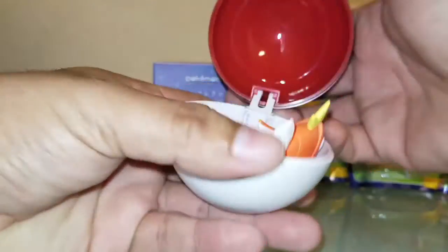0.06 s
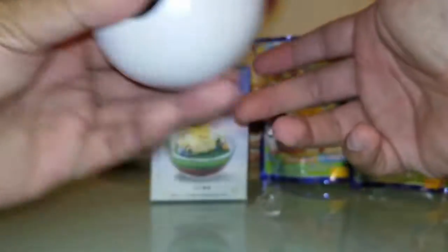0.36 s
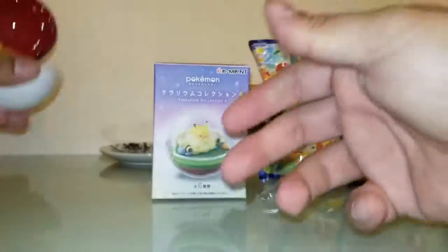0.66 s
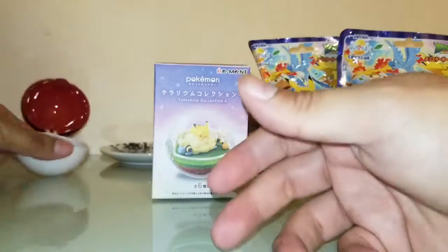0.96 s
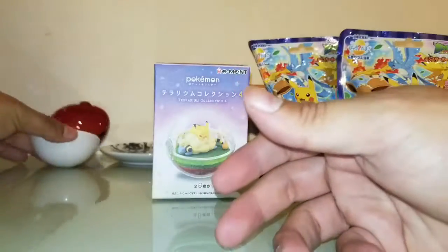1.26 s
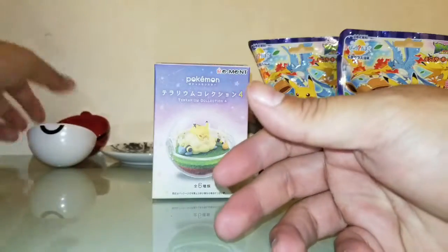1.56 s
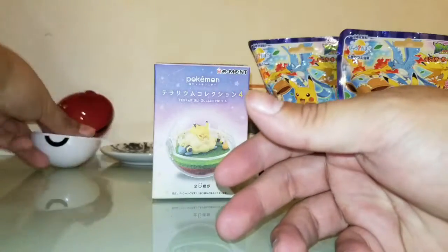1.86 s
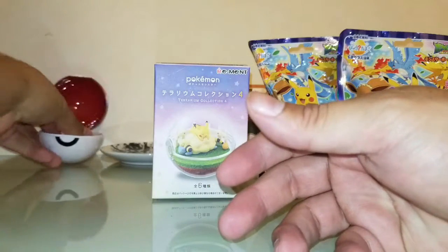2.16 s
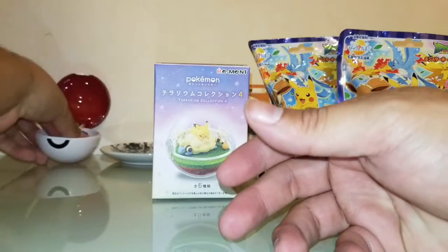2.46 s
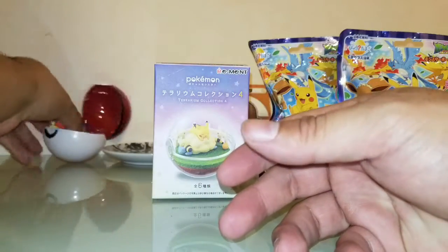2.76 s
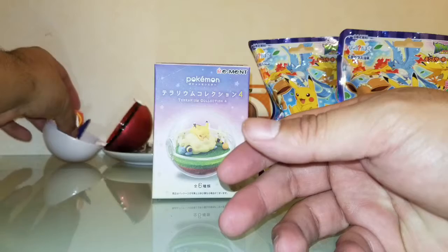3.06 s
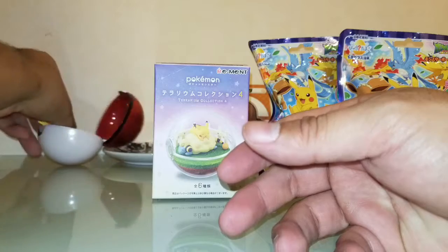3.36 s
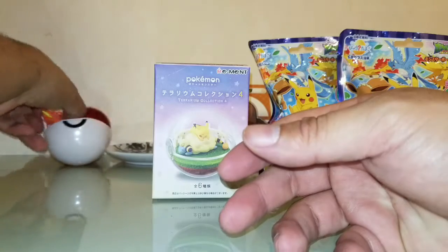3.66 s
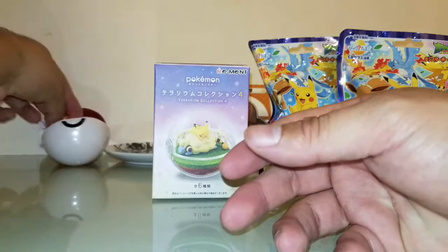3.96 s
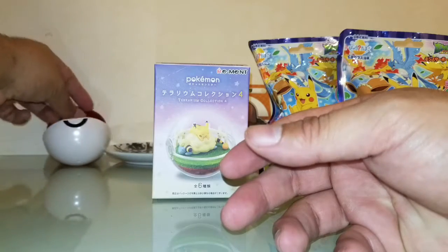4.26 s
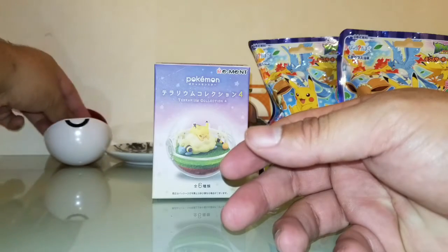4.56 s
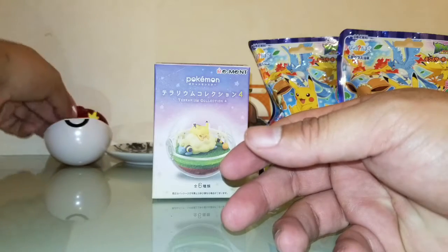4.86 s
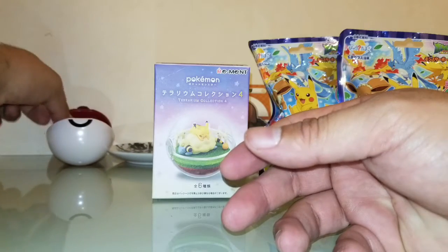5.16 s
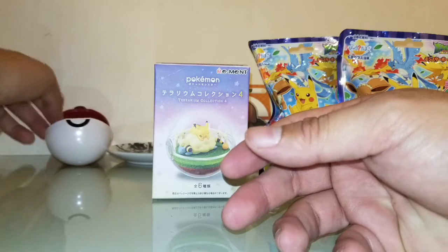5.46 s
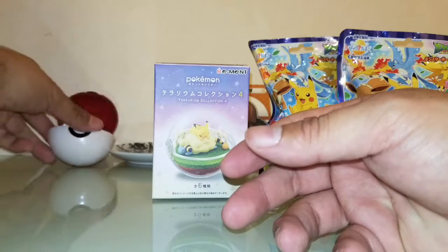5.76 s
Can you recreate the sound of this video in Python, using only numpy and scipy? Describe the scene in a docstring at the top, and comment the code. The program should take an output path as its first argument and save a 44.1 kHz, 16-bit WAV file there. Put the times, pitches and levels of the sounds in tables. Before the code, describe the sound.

A hollow plastic toy ball is handled slightly left of the microphone in a small, lightly echoing room. A faint rumble and motor hum continue throughout, and fingers hiss softly on the plastic now and then. At about 0.6 seconds a catch clicks sharply and the hinge scrapes. The ball knocks on a glass table at 0.85 seconds, clacks again at 1.2 and gives a soft, hollow bump at 1.8. From 2.5 to 2.9 seconds comes a cluster of clacks, the sharpest near 2.75, which sets a china saucer ringing briefly. A hollow bump at 3.5 seconds is followed at once by a bright snap of the catch. Lighter, uneven clicks and small scrapes continue as the halves are fitted together, with a firmer clack and faint china ring at 4.9 seconds and a smaller clack at 5.4.

```python
"""A small room, a glass table: a hollow two-part plastic toy ball is handled left of the microphone.
Over a faint rumble and motor hum, fingers hiss on the plastic and the lid scrapes at its hinge.
The halves, a domed lid and a bowl, clack against each other and the table, ringing their modes.
Now and then the springy catch slips, the bowl bumps the table or a knock rings a china saucer."""
import sys
import numpy as np
from scipy import signal
from scipy.fft import rfft, irfft, next_fast_len
from scipy.io import wavfile
from scipy.ndimage import uniform_filter1d, map_coordinates

SR = 44100
rng = np.random.default_rng(int(sys.argv[2]) if len(sys.argv) > 2 else 0)


def file_out(sig):
    """Save sig as 16-bit WAV at sys.argv[1]."""
    # one column per channel
    cols = np.atleast_2d(sig).T
    # limit, then scale
    lim = np.clip(cols, -1, 1)
    pcm = np.round(lim * 32767).astype(np.int16)
    wavfile.write(sys.argv[1], SR, pcm)


N = 255768
TIME_S = np.arange(N) / SR
RING_SIZE = 24576   # samples per blow
RING_S, RING_HZ = np.arange(RING_SIZE) / SR, np.fft.rfftfreq(RING_SIZE, 1 / SR)
RIGHT_LAG_S = 0.00015   # ball lies to the left


def from_db(db):
    """Decibels to gain."""
    return 10 ** (np.asarray(db) / 20)


def rms_one(x):
    """Scale to unit power."""
    return x / np.sqrt(np.mean(x ** 2) + 1e-20)


def at_hz(points, hz):
    """Read (f/Hz, value) rows on a log-frequency axis."""
    f, value = np.transpose(points)
    return np.interp(np.log(np.maximum(hz, 1)), np.log(f), value)


def add(out, start_s, sound):
    """Mix in a stereo sound, last tenth faded."""
    at = int(round(start_s * SR))
    fade = np.minimum(1, 10 * np.linspace(1, 0, sound.shape[1])) ** 2
    out[:, at:at + sound.shape[1]] += (sound * fade)[:, :N - at]


def drift(rate_hz):
    """Slow random wander, spread 1."""
    hz = np.fft.rfftfreq(RING_SIZE, 1 / 1000)   # 1 ms steps
    slow = irfft(rfft(rng.standard_normal(RING_SIZE)) / (1 + (hz / rate_hz) ** 2))
    return np.interp(TIME_S * 1000, np.arange(RING_SIZE), rms_one(slow))


def coloured(x, spectrum):
    """Give a steady sound a spectrum; rms 1."""
    size = next_fast_len(N)
    gain = from_db(at_hz(spectrum, np.fft.rfftfreq(size, 1 / SR)))
    return rms_one(irfft(rfft(x, size) * gain, size)[:, :N])


def causal(level_db):
    """Minimum-phase response: peaks ring after the blow, never before."""
    cepstrum = irfft(np.log(from_db(level_db)))
    cepstrum[1:RING_SIZE // 2] *= 2
    cepstrum[RING_SIZE // 2 + 1:] = 0
    return np.exp(rfft(cepstrum))


def evened(spectrum, bins):
    """Flatten a random response to unit level, keeping its fine grain."""
    power = np.mean(np.abs(np.atleast_2d(spectrum)) ** 2, axis=0)
    return spectrum * causal(-10 * np.log10(uniform_filter1d(power, bins) + 1e-3))


def decay(t60_s):
    """Exponential decay of unit energy."""
    fall = from_db(-60 * RING_S / t60_s)
    return fall / np.sqrt(np.sum(fall ** 2))


# diffuse field: f/Hz, left-right correlation/1
CORRELATION = [(60, .97), (370, .97), (500, 0), (800, -.25), (1600, -.1), (4000, 0)]

def diffuse(size):
    """White stereo noise from all sides: alike in the bass, unrelated in the treble."""
    alike = at_hz(CORRELATION, np.fft.rfftfreq(size, 1 / SR))
    mid, side = rfft(rng.standard_normal((2, size)))
    return irfft(np.sqrt((1 + alike) / 2) * mid + np.sqrt((1 - alike) / 2) * side * [[1], [-1]], size)


# background envelope: t/s, level/dB
BACKGROUND_LEVEL = [(0, -51.5), (.55, -49.5), (1, -53), (1.5, -60), (2.1, -53.5), (2.6, -50.5),
                    (3.3, -51.5), (4.4, -51.5), (5.2, -51.5), (5.8, -53.5)]
# rumble spectrum: f/Hz, level/dB
RUMBLE_SPECTRUM = [(12, -28.5), (20, -5), (70, -10.5), (124, -3), (184, -16), (242, -14), (422, -10),
                   (463, -15.5), (520, -12), (1220, -34.5), (2180, -34), (2680, -44), (5000, -44.5),
                   (6500, -61), (11000, -120)]
# motor tones: f/Hz, level/dB re envelope
HUM_TONES = [(120, -6.5), (240, -14), (323, -21)]

def background(rumble_db=-1.5, waver_db=3.0, waver_rad=1.0):
    """Low room noise with a wavering motor hum."""
    hum = np.zeros(N)
    for hz, db in HUM_TONES:
        amplitude = np.sqrt(2) * from_db(db + waver_db * drift(4.6))
        hum += amplitude * np.sin(2 * np.pi * hz * TIME_S + waver_rad * drift(1.9))
    rumble = from_db(rumble_db) * coloured(diffuse(N), RUMBLE_SPECTRUM)
    return from_db(np.interp(TIME_S, *np.transpose(BACKGROUND_LEVEL))) * (rumble + hum)


def strokes(rows, rest_db, attack_share, roundness):
    """Gain of sliding movements: each speeds up to its level, then slows to rest."""
    power = np.full(N, from_db(rest_db) ** 2)
    for start_s, length_s, db in rows:
        moving = slice(*np.searchsorted(TIME_S, [start_s, start_s + length_s]))
        speed = np.interp((TIME_S[moving] - start_s) / length_s, [0, attack_share, 1], [0, 1, 0])
        power[moving] += (from_db(db) * np.sin(speed * np.pi / 2) ** roundness) ** 2
    return np.sqrt(power)


# finger slides: t/s, length/s, level/dB
FINGER_RUBS = [(-.05, .12, -61.5), (0.059, 0.2, -64), (0.242, 0.25, -60), (0.517, 0.38, -60),
               (1.079, 0.13, -72.5), (1.548, 0.23, -73.5), (1.83, 0.11, -67), (1.971, 0.074, -77),
               (2.214, 0.14, -61.5), (2.36, 0.55, -61.5), (3.064, 0.25, -57.5), (3.27, 0.4, -65),
               (3.797, 0.26, -65), (4.79, 0.22, -63.5), (5.1, 0.26, -77), (5.569, 0.072, -65)]
# hiss spectrum: f/Hz, level/dB
RUB_SPECTRUM = [(2000, -7.5), (4000, -7), (6000, -4.5), (7600, 2), (9500, -6), (12500, -1), (16000, -7.5)]

def fingers(gain_db=3.0, grip_db=-75.5, flutter_db=1.75, grain_db=3):
    """Skin sliding on smooth plastic gives a fine, slightly grainy hiss."""
    grains = diffuse(N) * from_db(grain_db * rng.standard_normal(N))
    sliding = strokes(FINGER_RUBS, grip_db, attack_share=0.45, roundness=0.73)
    return sliding * from_db(gain_db + flutter_db * drift(25)) * coloured(grains, RUB_SPECTRUM)


# lid turns: t/s, length/s, level/dB
HINGE_TURNS = [(-.02, 0.093, -64.5), (.13, 0.1, -68.5), (.35, 0.18, -63), (.65, .18, -49),
               (1.63, 0.42, -71.5), (2.62, 0.061, -66), (3.115, 0.11, -53), (3.38, 0.17, -64),
               (4.15, 0.13, -51), (4.33, 0.25, -65), (5.04, 0.1, -60)]

def hinge(slips_per_s=900, smear=0.04, loose_play_db=-82):
    """Tiny uneven slips of the joint excite the shell's middle resonances."""
    slips = (rng.random(N) < slips_per_s / SR) * rng.standard_normal(N)
    spectrum_hz_db = [(300, -27), (1000, 3), (1700, -5), (2300, 12),
                      (2700, -19), (3050, 8.5), (3700, -27.5), (9000, -26)]
    turning = strokes(HINGE_TURNS, loose_play_db, attack_share=0.23, roundness=0.79)
    return turning * coloured(slips + smear * diffuse(N), spectrum_hz_db)


def fingertips(count=8, level_db=-67, spread_db=5, hardness_db=8, room_db=-6):
    """Contact rows for faint random ticks of sliding fingertips on the shell."""
    rows = []
    for which, when, strength in rng.random((count, 3)):
        start_s, length_s, _ = FINGER_RUBS[int(which * len(FINGER_RUBS))]
        db = level_db + spread_db * (2 * strength - 1)
        rows.append((max(0, start_s + when * length_s), db, 0, hardness_db, room_db))
    return rows


# reverberation: f/Hz, t60/s
ROOM_DECAY = [(100, 0.35), (300, 0.64), (800, 0.51), (2000, 0.42), (5000, 0.56), (13000, 0.32)]

def room_tails(count, near_t60_s=0.17, late_db=-5.5, build_s=0.0015):
    """One diffuse response per blow: dense table-corner echoes, then the room dying by octave."""
    octaves = np.arange(6, 15)   # log2(f/Hz)
    size = 8 * RING_SIZE
    field = rfft(diffuse(size))
    pitch = np.log2(np.fft.rfftfreq(size, 1 / SR) + 1)
    starts = rng.integers(0, size - RING_SIZE, count)
    tails = np.zeros((count, 2, RING_SIZE))
    for octave in octaves:
        band = irfft(field * np.interp(pitch, octaves, octaves == octave))
        late = from_db(late_db) * decay(at_hz(ROOM_DECAY, 2.0 ** octave))
        envelope = np.hypot(decay(near_t60_s), late) * (1 - np.exp(-RING_S / build_s))
        for tail, start in zip(tails, starts):
            tail += band[:, start:start + RING_SIZE] * envelope
    return tails


def shell_ripple(spacing_hz=170):
    """Random spectral peaks and dips, spread about 1: a thin shell's many short-lived modes."""
    knots = rng.standard_normal(512)
    ripple = map_coordinates(knots, [RING_HZ / spacing_hz], order=3, mode="mirror")
    return ripple * np.minimum(1, RING_HZ / (4 * spacing_hz))


# halves hit each other or the table: t/s, level/dB, weight/dB, hardness/dB, room send/dB
BALL_CONTACTS = [(0.3737, -63, 0, 14.5, -9), (0.6172, -59, -2, 16, -8), (0.6308, -45.5, 1.5, 16.5, -4),
                 (0.6521, -41.5, -10, -1, -1.5), (.699, -32.5, -58, -16.5, 3.5),
                 (0.8015, -39.5, -16, -19, 1), (0.8503, -18.5, -10.5, -15, 4.5), (1.195, -46, 10, -1, 4.5),
                 (1.2029, -30.5, -4, -0.5, 1), (1.634, -60, -6, -5, 7), (1.822, -44.5, 15, -8.5, 0),
                 (2.194, -57.5, 4, 6.5, -3), (2.4257, -60, -19, 13, 1), (2.481, -43.5, 11, -20, -3.5),
                 (2.5114, -26, -5, -4, -6), (2.532, -37, 7.5, -9, -11), (2.648, -50.5, 8, -2, -2.5),
                 (2.7391, -33, -20, -6.5, 6.5), (2.7473, -8, -29, -10.5, -13.5), (2.7538, -25, 0.5, 0.5, 5),
                 (2.803, -35, -2, -10, -3), (2.8726, -24.5, -7.5, -9.5, -2.5), (2.983, -44, 11, -21, -8.5),
                 (3.183, -40, -1, -5, -8), (3.3902, -48.5, -12, -4, -6), (3.464, -35, 8, 0.5, 0.5),
                 (3.5779, -24.5, -3, -4, 1.5), (3.7789, -49.5, -13, 10.5, -4), (3.8463, -44.5, 7, 1.5, 4),
                 (3.9023, -46, 13.5, 12.5, -10), (3.916, -54, 13, -2, 5), (3.933, -65.5, 40, -10, -5),
                 (3.985, -33.5, 1, -4, -5), (4.0497, -57, 13, -1, 4), (4.07, -50, -5, 0, -18),
                 (4.0888, -30, -4, -3.5, -3), (4.196, -35.5, -2.5, -10, -1), (4.2351, -35.5, -1.5, -2.5, 0),
                 (4.352, -55, 8, -13, -1.5), (4.568, -58, 2.5, 4.5, 2), (4.6158, -32.5, -3.5, -3, -1.5),
                 (4.8053, -48, 7, -1.5, 6), (4.815, -42.5, 4.5, -2, -0.5), (4.8609, -41, -6, -13, -26),
                 (4.875, -60, 11, 16.5, -14), (4.9034, -23, -4.5, 0.5, -3.5), (5.2379, -56.5, -26, -22, 7),
                 (5.293, -54.5, 12.5, -2, -2), (5.4016, -36.5, -1, -0.5, -1.5), (5.632, -57, 3.5, -3.5, 0)]
# mean contact spectrum: f/Hz, level/dB
SHELL_SPECTRUM = [(30, -26.5), (70, -5.5), (220, -4.5), (310, -1), (700, -2), (1000, -1.5), (1500, -4),
                  (2200, -4), (3000, -9), (3700, -17.5), (4500, -19), (7000, -16), (9500, -17),
                  (12500, -17), (16000, -26)]
# table, cavity and shell resonances: f/Hz, width/Hz, boost/dB
BODY_PEAKS = [(123, 12, 4), (308, 22, 8), (340, 14, 4), (590, 30, 5), (809, 22, 3), (914, 34, 8),
              (1035, 34, 8), (1319, 18, 6), (1522, 24, 6), (2050, 60, 5), (2440, 70, 4), (2739, 20, 5),
              (4950, 500, 3), (6300, 600, 3), (7000, 400, 3), (7800, 400, 3)]
# bass from weight: f/Hz, share/1
WEIGHT_BASS = [(160, 0.98), (550, 0.63), (1800, 0)]
# treble from a hard edge: f/Hz, share/1
HARDNESS_TREBLE = [(1800, 0.098), (6500, 0.93), (13000, 1)]
# direct sound, left over right: f/Hz, level/dB
LEFT_BIAS = [(300, 4.5), (600, -9), (1100, 3.5), (2000, 4), (2900, 20.5), (7000, 9.5), (13000, 18)]
# wall absorption in the room tail: f/Hz, level/dB
WALL_GAIN = [(2500, 0), (6000, -3), (13000, -4)]

def ball(gain_db=-1.5, direct_db=-8.0, wall_s=0.0093, wall_db=-8, crack_t60_s=0.011, ripple_db=3):
    """Brief rim crackles ring shell and table, heard directly, off the wall and through the room."""
    out = np.zeros((2, N))
    peaks_db = sum(db / (1 + (2 * (RING_HZ - hz) / width_hz) ** 2) for hz, width_hz, db in BODY_PEAKS)
    body_db = gain_db + at_hz(SHELL_SPECTRUM, RING_HZ) + peaks_db
    pan = from_db(at_hz(LEFT_BIAS, RING_HZ) * [[0.5], [-0.5]])
    lag = np.exp(-2j * np.pi * RING_HZ * [[0], [RIGHT_LAG_S]])
    wall_echo = from_db(wall_db) * np.exp(-2j * np.pi * RING_HZ * wall_s)
    paths = from_db(direct_db) * (pan * lag + wall_echo)
    absorption = causal(at_hz(WALL_GAIN, RING_HZ))
    bass, treble = at_hz(WEIGHT_BASS, RING_HZ), at_hz(HARDNESS_TREBLE, RING_HZ)
    contacts = BALL_CONTACTS + fingertips()
    for (start_s, db, weight_db, hardness_db, room_db), tail in zip(contacts, room_tails(len(contacts))):
        # weight, hardness and place of the touch decide which modes answer
        touch_db = weight_db * bass + hardness_db * treble + ripple_db * shell_ripple()
        crack = evened(rfft(rng.standard_normal(RING_SIZE) * decay(crack_t60_s)), bins=300)
        room = from_db(room_db) * absorption * evened(rfft(tail), bins=128)
        response = causal(db + body_db + touch_db)
        add(out, start_s, np.sqrt(SR) * irfft((crack * paths + room) * response))
    return out


def struck(hits, modes, left_db, swell_s, room_db, room_t60_s):
    """Modes ring at each blow, brighter or duller by that blow's tilt; the room makes the ring waver."""
    out, rings = np.zeros((2, N)), []
    attack = 1 - np.exp(-RING_S / swell_s)
    for hz, db, t60_s in modes:
        phase = rng.uniform(0, 2 * np.pi) - 2 * np.pi * hz * np.array([[0], [RIGHT_LAG_S]])
        envelope = attack * from_db(db - 60 * RING_S / t60_s)
        rings.append(envelope * np.sin(2 * np.pi * hz * RING_S + phase))
    octaves_up = np.log2(np.array(modes)[:, 0] / modes[0][0])
    pan = from_db([[left_db / 2], [-left_db / 2]])
    for start_s, db, tilt_db_per_oct in hits:
        ring = np.tensordot(from_db(db + tilt_db_per_oct * octaves_up), rings, 1)
        room = signal.fftconvolve(ring, diffuse(RING_SIZE) * decay(room_t60_s), axes=1)[:, :RING_SIZE]
        add(out, start_s, ring * pan + from_db(room_db) * room)
    return out


# lid modes: f/Hz, level/dB, t60/s
LID_MODES = [(914, -6.5, .13), (1035, -12, .1), (1319, -14, .24), (1525, -11, .17), (2050, -15, .14),
             (2985, -4, .04), (3053, 1.5, .06), (3135, -7, .035)]

def lid(shut_s=3.7):
    """The domed lid rings at each contact of the halves, brighter once it sits on the bowl."""
    hits = []
    for start_s, db, *_ in BALL_CONTACTS:
        offset_db, tilt_db_per_oct = (-2.4, 4.14) if start_s > shut_s else (-3.5, 1.45)
        hits.append((start_s, db + offset_db, tilt_db_per_oct))
    return struck(hits, LID_MODES, left_db=5, swell_s=0.0008, room_db=-6, room_t60_s=0.25)


# catch slips: t/s, level/dB, tilt/(dB/oct)
CATCH_SLIPS = [(.6186, -46.5, -5.5), (.6304, -18, -4), (3.579, -14.5, -3), (3.591, -24, -3.5),
               (3.78, -34, -3), (3.847, -33, -3), (3.903, -31, -3), (4.05, -43, -3)]
# catch modes: f/Hz, level/dB, t60/s
CATCH_MODES = [(7330, 0, .014), (7480, -6, .012), (7960, -7, .018), (11400, -14, .006)]

def catch():
    """The springy catch slips; its high modes die at once in a click."""
    return struck(CATCH_SLIPS, CATCH_MODES, left_db=2.5, swell_s=0.0002, room_db=-5, room_t60_s=0.3)


# bowl bumps: t/s, level/dB, tilt/(dB/oct)
BOWL_BUMPS = [(.851, -23, 12), (1.825, -21.5, -3.5), (3.465, -16.5, -19.5), (3.579, -25, -0.5)]
# bowl modes: f/Hz, level/dB, t60/s
BOWL_MODES = [(405, -11, .1), (460, -6, .08), (488, -1, .11), (598, -1, .125), (655, -8, .07),
              (735, -5, .07)]

def bowl():
    """The bowl bumps the table and its hollow modes ring."""
    return struck(BOWL_BUMPS, BOWL_MODES, left_db=-1.5, swell_s=0.005, room_db=-7, room_t60_s=0.35)


# saucer knocks: t/s, level/dB, tilt/(dB/oct)
SAUCER_KNOCKS = [(1.204, -35.5, -10), (2.512, -35, -18), (2.747, -25.5, 3), (2.873, -37, 2),
                 (3.579, -49, -10), (4.089, -52, -14), (4.235, -52, -14), (4.616, -52, -14),
                 (4.904, -37, -19), (5.401, -52, -14)]
# saucer modes: f/Hz, level/dB, t60/s
SAUCER_MODES = [(2437, 1, .48), (2442, -11, .55), (4978, 1, .04), (5175, -18, .4), (5452, -4, .23),
                (5522, -9, .2), (6250, -21, .3), (6330, 4, .035), (6804, -15, .16), (7150, 1, .03),
                (8192, -12, .3), (8225, -19, .22), (11420, -19, .16), (14940, -18, .12)]

def saucer():
    """Knocked china: brief modes clack, close pairs ring on and beat."""
    return struck(SAUCER_KNOCKS, SAUCER_MODES, left_db=1, swell_s=0.002, room_db=-8, room_t60_s=0.25)


def scene():
    """Blows and friction over the room's background, in stereo."""
    blows = saucer() + lid() + catch() + bowl() + ball()
    return blows + fingers() + hinge() + background()


def record(dry, cutoff_hz=16000):
    """Soft clip, then a steep low-pass."""
    lowpass = signal.ellip(10, 0.1, 90, cutoff_hz, fs=SR, output="sos")
    return signal.sosfilt(lowpass, np.tanh(dry))


dry = scene()
out = record(dry)
file_out(out)
```